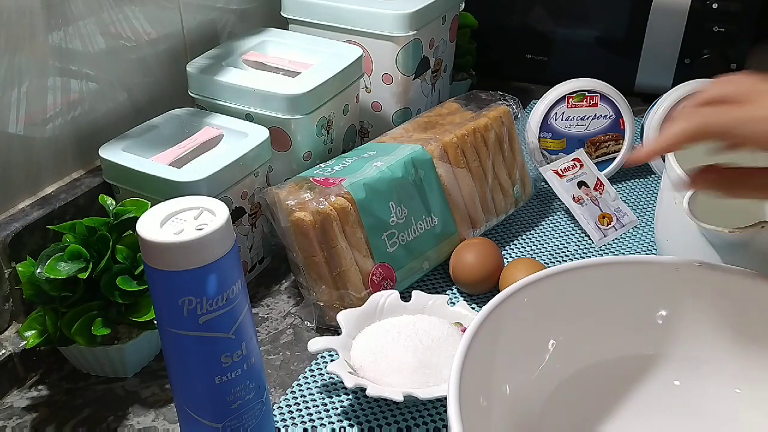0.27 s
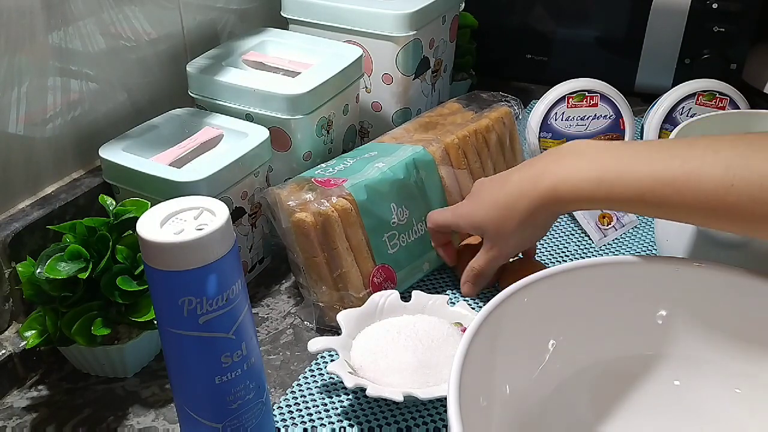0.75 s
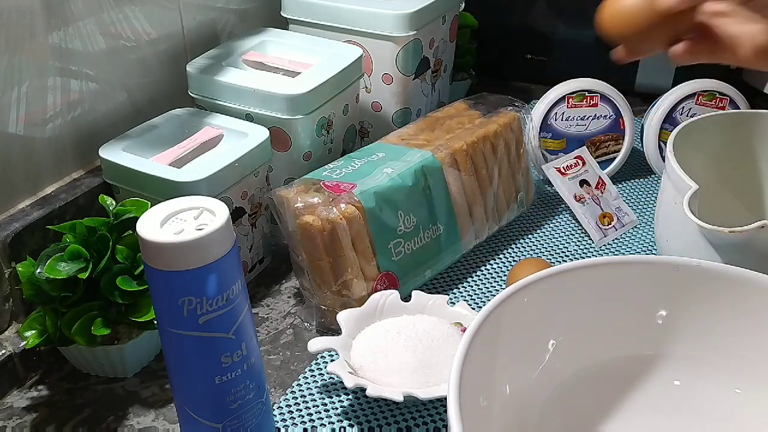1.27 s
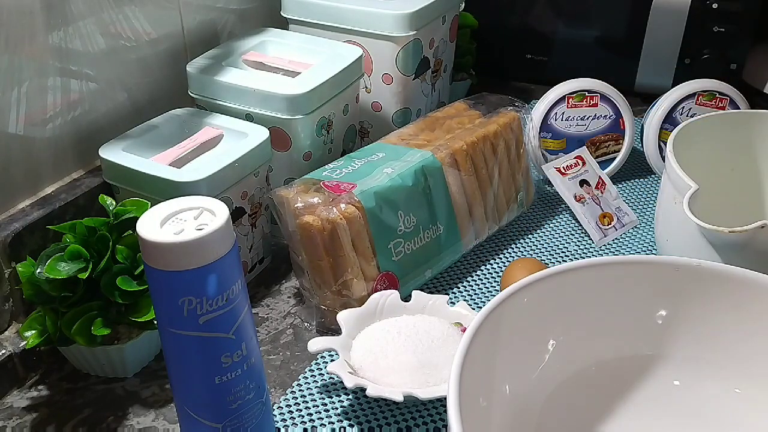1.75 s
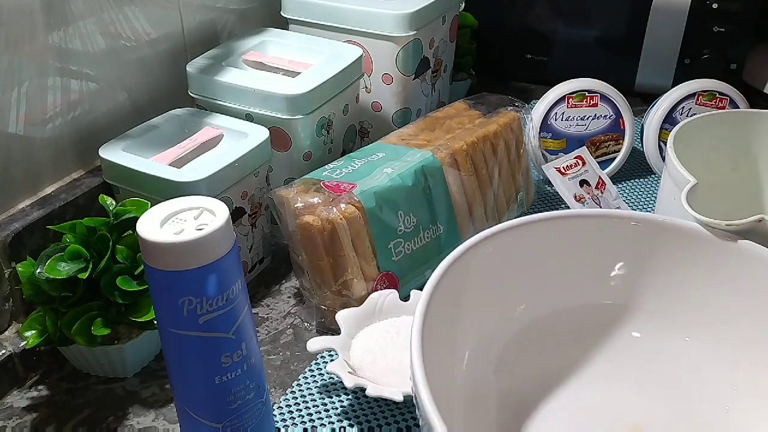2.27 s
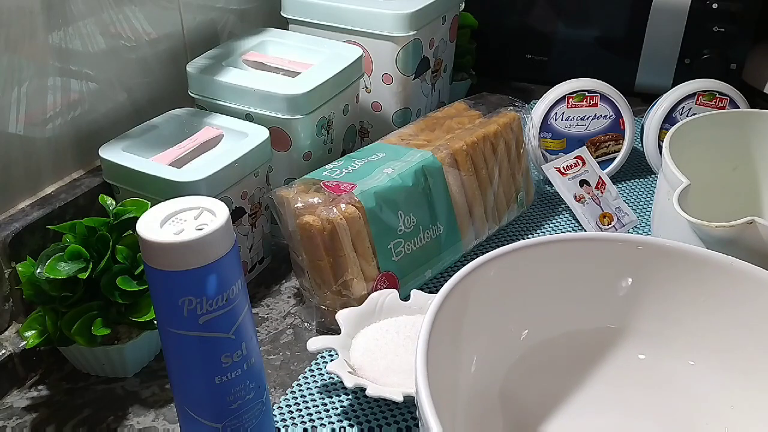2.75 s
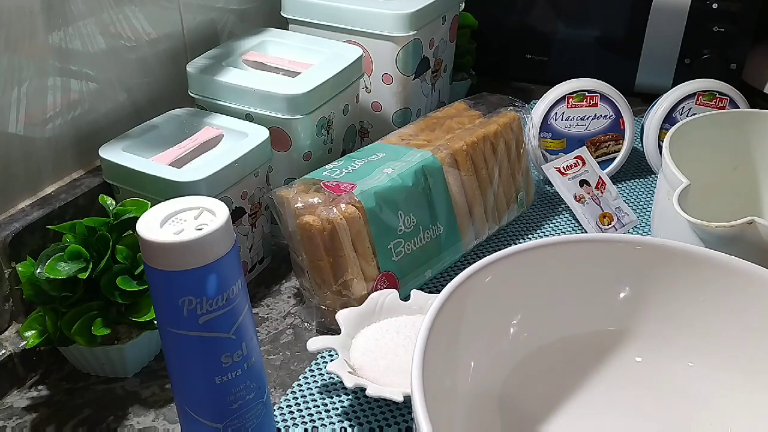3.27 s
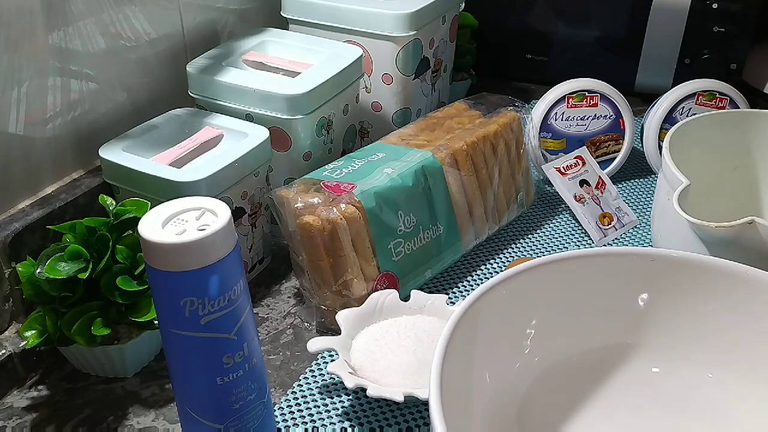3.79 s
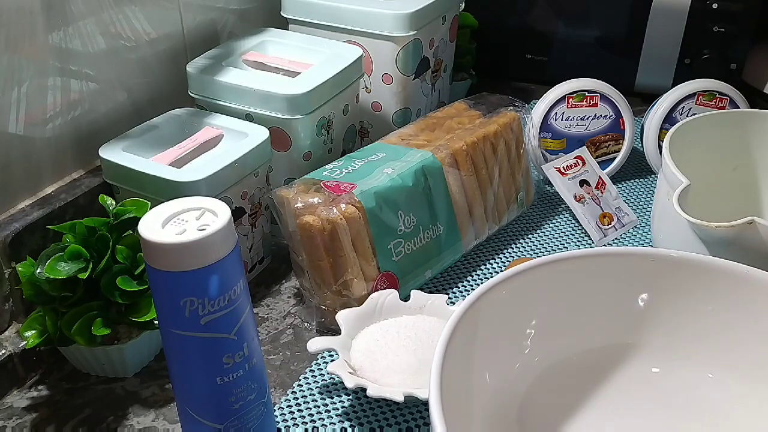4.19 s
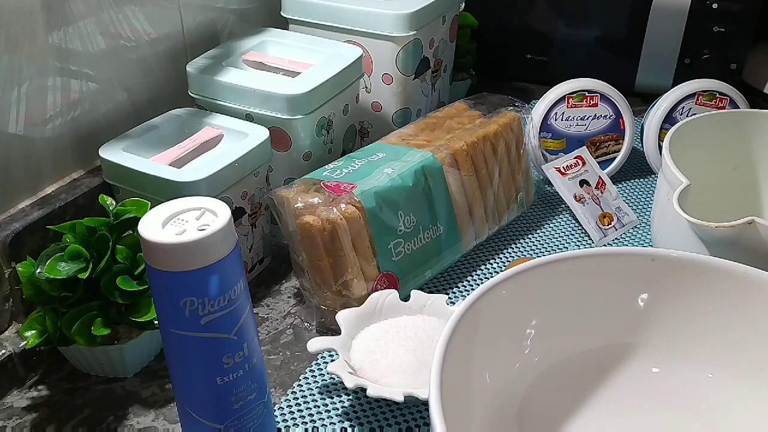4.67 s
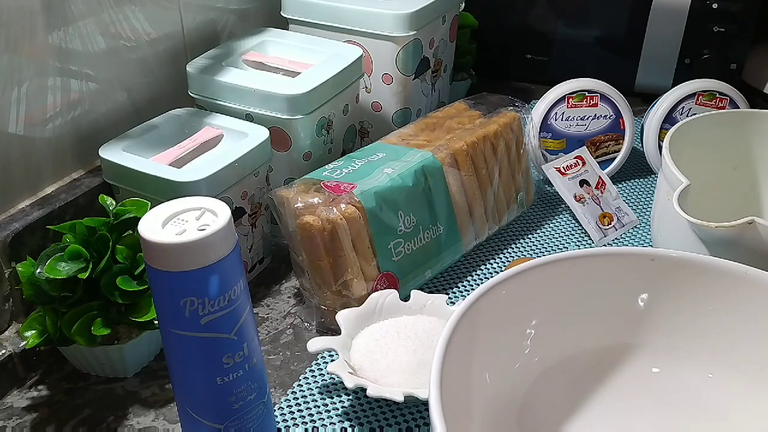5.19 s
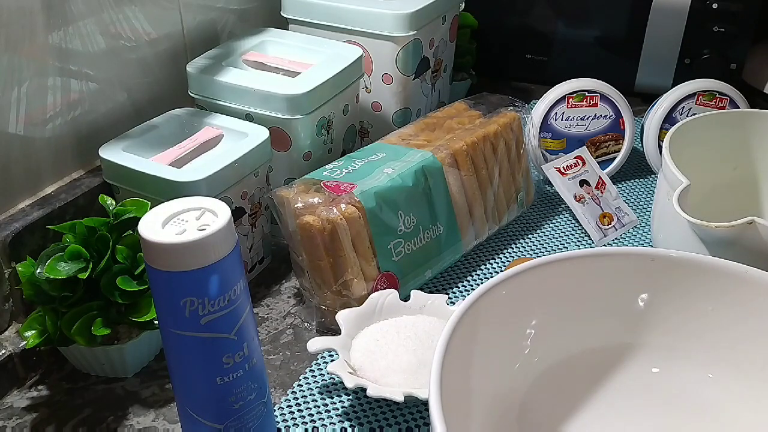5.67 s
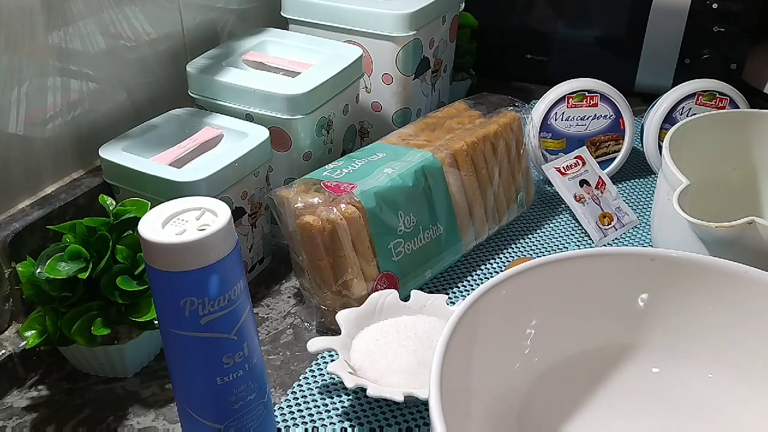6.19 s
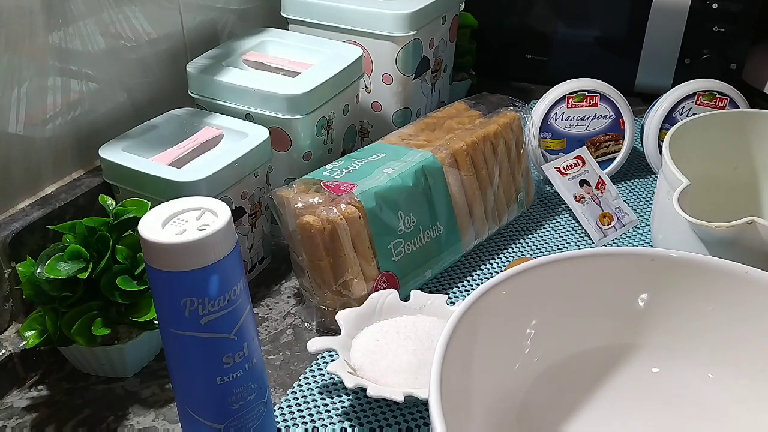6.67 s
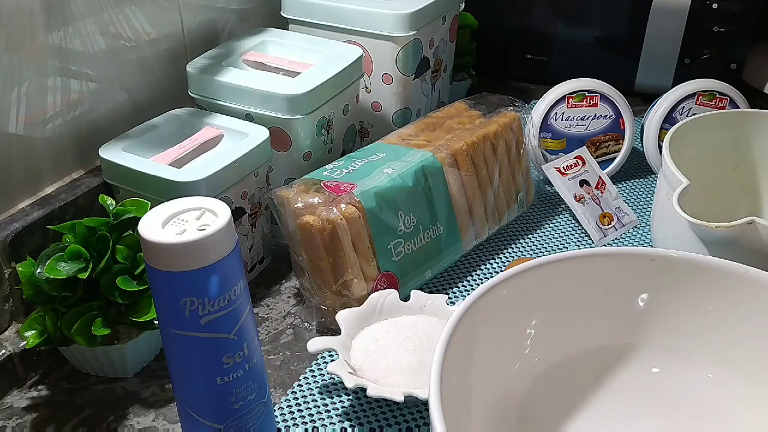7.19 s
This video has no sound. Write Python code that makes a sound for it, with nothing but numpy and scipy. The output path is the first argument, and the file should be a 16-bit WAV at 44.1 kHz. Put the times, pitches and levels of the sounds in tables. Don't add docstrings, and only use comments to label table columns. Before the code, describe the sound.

Close-up kitchen handling: soft rubbing and finger taps, short bright bowl clinks, two dry egg cracks, then small shell crackles over faint hum.

```python
import sys
import numpy as np
from scipy import signal
from scipy.fft import rfft, irfft, next_fast_len
from scipy.io import wavfile
from scipy.ndimage import uniform_filter1d

SR = 44100
rng = np.random.default_rng(int(sys.argv[2]) if len(sys.argv) > 2 else 0)


def to_wav(s):
    ch = np.atleast_2d(s).T
    pcm = np.round(np.clip(ch, -1, 1) * 32767)
    wavfile.write(sys.argv[1], SR, pcm.astype(np.int16))


def to_linear_factor(level_db):
    exponent = np.asarray(level_db, float) / 20
    return 10 ** exponent


N = 328104

MAINS_HZ = [100, 300, 500, 600]
# time in seconds, then the level of each overtone in dB
HUM_LEVELS = [(0, -81, -94.5, -90.5, -99), (5.6, -80, -98.5, -99, -99), (5.68, -82.5, -67.5, -67, -84.5),
              (5.95, -90, -70, -72, -80), (6.04, -83, -84, -82, -81), (6.25, -75, -80, -83, -83),
              (6.4, -84, -68, -76, -87), (6.6, -80, -74, -67, -87), (6.7, -73, -75, -74, -90),
              (6.92, -82.5, -75, -82, -85), (6.99, -76, -78, -66, -90), (7.14, -83, -72, -71, -89),
              (7.2, -82, -91, -86, -92), (7.3, -87, -90, -69, -86), (7.44, -84, -82, -85, -92)]
# frequency in Hz, density in dB per Hz
FLOOR_COLOUR = [(8.8, -32), (15, 2), (25, -8.5), (38, -20.5), (107, -20), (131, -32), (171, -25),
                (236, -26), (281, -29), (399, -29), (1490, -39.5), (1630, -39), (6460, -42.5), (10900, -38),
                (12300, -46.5), (16500, -55)]
# frequency in Hz, likeness from 0 to 1
LEFT_RIGHT_LIKENESS = [(30, 0.067), (250, 0.62), (1000, 0.043), (4000, 0.037), (12000, 0.039)]
# frequency in Hz, t60 in seconds
ROOM_T60 = [(150, 0.45), (600, 0.48), (2000, 0.5), (6000, 0.43), (10000, 0.36), (15000, 0.25)]
# frequency in Hz, density in dB per Hz
FIZZ_COLOUR = [(2060, -8), (3500, -4.5), (6650, -4), (9380, 0.5), (10800, -3.5), (15400, -18.5),
               (16200, -30.5), (16500, -48.5)]
# frequency in Hz, density in dB per Hz
BODY_COLOUR = [(300, -63), (600, -16), (900, -3), (2000, -4), (3500, -10.5), (6000, -19.5), (9000, -71)]
# frequency in Hz, density in dB per Hz
THUD_COLOUR = [(70, -21.5), (150, -6.5), (300, -6.5), (700, -8), (1200, -26), (2500, -88)]
# full strength at in seconds, hold in seconds, fizz in dB, body over fizz in dB
STROKES = [(0.0, 0.083, -65, 4), (0.12, 0.064, -61, -11), (0.286, 0.015, -66.5, -1),
           (0.358, 0.016, -73.5, 8.5), (0.507, 0.012, -53.5, 1.5), (0.694, 0.17, -52, -3.5),
           (0.892, 0.15, -60, 1.5), (1.14, 0.021, -65.5, -2.5), (1.443, 0.082, -61.5, -6.5),
           (1.65, 0.13, -68, -6.5), (1.814, 0.1, -65.5, 0.5), (2.007, 0.27, -71, -3.5),
           (2.807, 0.029, -63.5, -0.5), (3.165, .012, -74, -14), (3.368, 0.014, -53, -4.5),
           (3.422, 0.015, -70, -10), (3.573, 0.013, -72.5, -36), (3.662, 0.017, -66, -36),
           (3.807, 0.013, -61, 1), (4.807, 0.02, -65, 1.5), (5.147, 0.017, -68.5, -21),
           (5.245, .012, -77.5, 2), (5.639, .012, -68, -14), (5.809, 0.0096, -57.5, -2.5),
           (5.909, 0.017, -56.5, -13), (6.424, 0.084, -73, -23), (6.618, 0.03, -56.5, -18),
           (6.801, 0.025, -65, -1.5), (6.974, 0.2, -83, 9), (7.194, 0.014, -66, -7),
           (7.322, 0.0097, -62.5, -16)]
# full strength at in seconds, hold in seconds, thud in dB
SHOVES = [(0.0, 0.16, -64), (0.316, 0.033, -61), (0.51, 0.0099, -55), (0.67, 0.013, -56),
          (0.806, 0.33, -63), (1.38, 0.51, -71), (1.914, 0.0085, -55), (1.956, 0.039, -100),
          (2.762, 0.013, -74), (3.375, 0.013, -61.5), (4.816, .012, -79), (5.644, 0.31, -72.5),
          (6.445, 0.26, -67.5), (6.958, 0.19, -65), (7.302, 0.17, -70)]
# start in seconds, level in dB, pitch in Hz, t60 in seconds
NUDGES = [(.03, -58, 120, 0.27), (0.091, -56, 500, 0.11), (0.201, -58, 117, .3), (.27, -53, 120, 0.21),
          (.34, -55, 115, .15), (.66, -47, 626, 0.045), (.69, -53, 450, .04), (0.141, -55, 240, 0.085),
          (.28, -50, 250, 0.075), (.305, -42, 560, .03), (.306, -47, 907, 0.045),
          (0.308, -50.5, 1433, 0.044), (.32, -45, 530, 0.032), (.35, -52, 710, 0.052),
          (.36, -46, 964, 0.038), (.362, -49, 550, 0.046), (0.446, -50, 1970, 0.023), (.565, -46, 190, .06),
          (.7075, -47, 9500, .004), (.908, -42, 2720, 0.011), (1.011, -55, 10500, .004),
          (1.884, -57, 1933, 0.19), (1.97, -67, 2880, 0.14), (2.008, -59.5, 1860, 0.094),
          (2.009, -66, 7540, 0.071), (2.01, -72, 6170, 0.055), (2.02, -67, 2880, .15),
          (2.061, -71, 1850, 0.066), (2.225, -41.5, 2500, 0.038), (2.212, -56, 3540, 0.014),
          (2.216, -52, 4400, 0.0071), (2.222, -48, 596, 0.034), (2.232, -48, 348, .04),
          (2.236, -52, 1210, 0.018), (2.2565, -17, 4876, 0.087), (2.256, -30, 2873, 0.35),
          (2.256, -33, 4160, .1), (2.256, -39, 3182, 0.07), (2.302, -27, 1868, 0.12),
          (2.33, -36, 4878, 0.33), (2.456, -29.5, 1810, 0.27), (2.472, -45.5, 1850, .6),
          (2.452, -45.5, 4876, 0.38), (2.452, -47, 4820, 0.44), (2.47, -52, 3700, 0.15),
          (2.78, -63, 396, .05), (2.8, -62.5, 2954, 0.093), (3.33, -61, 2880, .08), (3.335, -56, 1850, .1),
          (3.366, -50.5, 1860, 0.12), (3.37, -47, 920, .05), (3.375, -49, 235, 0.046),
          (3.82, -63.5, 952, .25), (4.414, -45, 243, .06), (4.437, -47, 130, .09),
          (6.249, -55, 275.6, 0.14), (6.645, -44, 2030, 0.019), (6.66, -47, 2800, 0.023),
          (6.44, -54.5, 259, .3), (6.47, -58, 118.7, .25), (6.7, -52, 265, .08), (7.04, -55, 172.7, 0.17),
          (7.08, -57, 280, 0.17), (7.163, -58, 10000, 0.0058), (7.197, -50, 2320, .02),
          (7.213, -49, 8800, .012), (7.301, -58, 250, 0.22)]
# start in
# seconds, level in dB, pitch in Hz, t60 in seconds
BUMPS = [(0, -65.5, 121, 6.2), (0.041, -58.5, 254.7, 2), (0.1556, -35, 2750, 0.0052),
         (0.469, -45, 192, 0.069), (0.5, -27.5, 198, 0.03), (0.55, -65, 187, .15), (.622, -38, 423, 0.029),
         (.624, -35.5, 640, 0.012), (.633, -35, 520, 0.015), (1.8691, -19.5, 483.3, 0.017),
         (1.8698, -27.5, 795.6, 0.014), (1.8702, -34, 1050, 0.0063), (1.877, -28.5, 297.8, 0.032),
         (1.876, -39, 228.7, 0.16), (1.909, -34, 545, 0.016), (1.95, -43.5, 548, 0.016),
         (2.212, -49, 415.3, 0.04), (3.384, -53, 244, 0.083), (1.871, -59, 1839, 0.08),
         (1.871, -60, 2180, 0.069), (1.9, -67, 2877, 0.15), (2.01, -65.5, 4160, 0.073)]
# start in seconds, peak in dB, dullness in dB, left-right in dB
FINGERS = [(0.154, -64, 4, 5), (0.447, -60, 15, 4), (0.47, -33.5, -29, -5), (0.5026, -29, -11.5, 11.5),
           (0.5073, -23, -13.5, -2), (0.556, -30.5, -40, 6), (0.6533, -44, 3, 0), (0.6637, -34, -3, -1),
           (0.7053, -45, 5, 5), (0.7136, -41, -18, 16), (0.729, -32, -12, -3), (0.7583, -25.5, -9.5, -5),
           (0.769, -35, -7, 17), (0.8293, -31.5, -12, 6), (0.838, -29.5, -12, -9), (0.845, -29.5, -9, 4),
           (0.857, -30, -19, 0), (0.888, -27, -23, -1), (0.895, -23.5, -8, -2), (0.9651, -27.5, -20, 0),
           (0.977, -48, -10, 1), (1.0242, -34, -13, 3), (1.03, -31, -11, 1), (1.054, -33.5, -9.5, -3),
           (1.111, -25.5, -18.5, -0.5), (1.1184, -42, -17, -5), (1.389, -61, 13, 3),
           (1.481, -34.5, -12.5, 5), (1.679, -40, -13, 0)]
# start in seconds, peak in dB, dullness in dB,
# left-right in dB
SHELL = [(3.653, -45.5, -30.5, 14), (5.6353, -37.5, -9, 1), (5.7993, -43, -8, 12), (5.882, -34, -10, 3),
         (5.903, -46, -17, -5), (5.911, -31, -19, 4), (5.92, -38, -17, 3), (6.097, -46.5, -8.5, 2),
         (6.4043, -43, -16, 1), (6.4614, -44, -21, 0), (6.5198, -42.5, -21, 3), (6.594, -47.5, -16, -1),
         (6.6049, -44, -2, 4), (6.613, -41, -3, -5), (6.628, -41, -5, 8), (6.6331, -17, -18.5, 0.5),
         (6.9508, -41.5, 2.5, 2.5), (6.958, -52, 8, -8), (6.992, -38.5, -1.5, 1), (7.001, -55, 1, 0),
         (7.092, -43, -5.5, 0.5), (7.194, -52.5, -1.5, 8), (7.287, -38, -11, 2), (7.293, -29.5, -17, 0)]
# start in seconds, peak in dB, thud in dB, body in dB, left-right in dB
BLOWS = [
    (2.2108, -44.5, 21.5, 13.5, 1),
    (2.254, -11, -7, -5, -2.5),
    (2.2605, -15, -11.5, 0, 0.5),
    (2.4447, -23.5, -3.5, 5, 12),
    (2.4478, -23, -23, 3, 3.5),
]
# start in seconds, peak in dB, thud in dB, body in dB, left-right in
# dB
LEAD_IN = [
    (4.1805, -38.5, -43.5, -3.5, 0.0026),
]
# frequency in Hz, level in dB
SNAP_COLOUR = [(5500, -7), (6600, -6.5), (8000, -1.5), (10500, 2), (12500, -7.5), (16000, -15),
               (16900, -61.5)]
# start in seconds, strength in dB, tilt in dB per octave
TOUCHES = [
    (1.499, -63, 2),
    (1.872, -69, -2.5),
    (3.366, -81, 11.5),
    (3.691, -74.5, 2.5),
]
# pitch in Hz, level in dB, t60 in seconds
FREE_BOWL_MODES = [(382, 0, 1.6), (953, -2, 1.4), (1835, -15, .45)]
# start in seconds, strength in dB, left-right in dB, tilt in dB per octave, blow 0 or 1
CLINKS = [
    (2.252, -8.5, -4, 0, 0),
    (2.2597, -21, 0.5, 3.5, 0),
    (2.4441, -19, -3.5, 4, 1),
    (2.4462, -11.5, -0.5, 1.2, 1),
]
BOWL_HZ = [382, 575, 650, 942, 1118, 1408, 1585, 1775, 1830, 1872, 2170, 2330, 2531, 2855, 3640, 4160, 4655,
           4876, 5556, 6025, 6804, 7531, 7590, 8672, 9357, 9915, 11300, 12600, 13800, 15000, 754, 1265,
           1491, 1692, 2288, 2902, 3182, 3690, 3903, 4037, 5173, 5308, 5475, 5728, 6169, 6500, 7397, 8170,
           8538, 8904, 9625, 10680, 11160, 12075, 13248, 455, 830]
# first blow in dB, second blow in dB, t60 in seconds
BOWL_MODES = [(-23, -28.5, 0.22), (-10.5, -17.5, 0.07), (-18, -24, 0.14), (-8.5, -22, 0.18),
              (-7.5, -13.5, 0.049), (-8, -26.5, 0.06), (-10.5, -11.5, 0.042), (-6, -10.5, 0.09),
              (-20, -47, 0.15), (-23.5, -42, 0.072), (-12.5, -29, 0.04), (-18.5, -35, 0.11),
              (-20.5, -57, 0.37), (-12, -32.5, 0.18), (-19.5, -32, 0.058), (-20.5, -22, 0.078),
              (-17.5, -39.5, 0.066), (-12.5, -38, 0.13), (-17.5, -27, 0.079), (-21, -25, 0.06),
              (-19, -28, 0.073), (-15, -25, 0.051), (-22.5, -20.5, .1), (-20, -37, 0.076),
              (-22, -35.5, 0.12), (-13.5, -25, 0.061), (-23.5, -39, 0.11), (-27.5, -31.5, .06),
              (-25, -31.5, .05), (-31.5, -37, .05), (-20.5, -21, .1), (-21.5, -27.5, 0.048),
              (-16.5, -37.5, 0.11), (-10.5, -34.5, 0.074), (-28.5, -23.5, 0.1), (-30, -20, .09),
              (-24, -40.5, 0.043), (-33, -29.5, 0.057), (-28, -46, .05), (-28.5, -40, .05),
              (-26, -37.5, .05), (-36, -24, .06), (-18, -40.5, .05), (-22.5, -39, 0.081), (-22, -40, 0.13),
              (-26.5, -26.5, 0.067), (-14.5, -20, 0.036), (-19.5, -36, 0.037), (-20.5, -31, 0.065),
              (-23.5, -37, 0.071), (-20.5, -39.5, 0.096), (-34.5, -38.5, .05), (-28, -27, 0.055),
              (-33.5, -39, .05), (-29.5, -41, .05), (-16, -17.5, 0.065), (-17, -13.5, .05)]
# start in seconds, level in dB, pitch in Hz,
# touch in seconds, choke in dB, t60 in seconds after
RIMS = [
    (2.2521, -8.5, 1872, 0.015, -9, .3),
    (2.4461, -14.5, 1845, 0.011, -16.5, 0.5),
]
# start in seconds, level in dB, left-right in dB, crack t60 in seconds, rise in seconds
KNOCKS = [
    (4.1901, 7.5, 0, 0.02, 0.00033),
    (4.412, -0.5, 1, 0.037, .003),
]
# frequency in Hz, level in dB
KNOCK_COLOURS = [
    [(25, -11.5), (110, -18), (230, -16), (380, -24), (520, -12), (680, -12), (810, -8), (1000, -10),
     (1250, -12), (1450, -9), (1650, -7.5), (1850, -8), (2060, -9), (2400, -12), (2700, -15.5),
     (3200, -15.5), (3760, -13), (4450, -19.5), (5610, -9.5), (6300, -12.5), (7500, -6), (8650, -4.5),
     (10800, -10), (12800, -17), (16300, -22), (17000, -62.5)],
    [(25, -25), (156, -10.5), (396, -19.5), (500, -11.5), (910, -14.5), (1150, -8), (1370, -5),
     (1700, -13.5), (2200, -5.5), (2500, -5.5), (2830, -6.5), (3200, -12.5), (3830, -8.5), (5380, -12),
     (5950, -11.5), (6400, -8.5), (10800, -3.5), (12800, -18), (16000, -16), (16800, -66)],
]


def unit(x):
    return x / np.sqrt(np.mean(x ** 2) + 1e-20)


def along(points, hz):
    f, v = np.transpose(points)
    return np.interp(np.log(hz + 1), np.log(f + 1), v)


def curves(rows):
    s, *cols = np.transpose(rows)
    return [np.interp(np.arange(N) / SR, s, c) for c in cols]


def add(track, s, sound):
    part = track[:, round(s * SR):][:, :sound.shape[1]]
    part += sound[:, :part.shape[1]]


def patches(shape, bins, frames):
    field = uniform_filter1d(rng.standard_normal(shape), size=bins, axis=0)
    return unit(uniform_filter1d(field, size=frames, axis=1))


def rush(spectrum, patchy_db):
    z = signal.stft(rng.standard_normal((2, N)), nperseg=256)[2]
    field = patches(z.shape[1:], 10, 5)
    pair = signal.istft(z * to_linear_factor(patchy_db * field), nperseg=256)[1][:, :N]
    hz = np.fft.rfftfreq(N, 1 / SR)
    turn = np.arccos(np.clip(along(LEFT_RIGHT_LIKENESS, hz), -1, 1)) / 2
    shared = [np.cos(turn), np.sin(turn)]
    mid, side = irfft(rfft(pair, N) * to_linear_factor(along(spectrum, hz)) * shared, N)
    return np.array([mid + side, mid - side]) / np.std(mid + side)


def causal(spectrum):
    cepstrum = irfft(np.log(to_linear_factor(along(spectrum, np.fft.rfftfreq(2048, 1 / SR)))))
    cepstrum[1:1024] *= 2
    cepstrum[1025:] = 0
    return irfft(np.exp(rfft(cepstrum)))[:1024]


def swells(starts, holds, levels_db):
    swell_db_per_s, fade_db_per_s = 311, 138
    t = np.arange(0, N, 64) / SR
    gain = 0
    for s, hold, db in zip(starts, holds, levels_db):
        swell_db = swell_db_per_s * np.maximum(s - t, 0)
        fade_db = fade_db_per_s * np.maximum(t - s - hold, 0)
        gain = gain + to_linear_factor(db - swell_db - fade_db)
    return np.interp(np.arange(N) / SR, t, gain)


def ringing(modes, seconds, rise_s):
    t = np.arange(round(seconds * SR)) / SR
    ring = sum(to_linear_factor(db - 60 * t / t60) * np.sin(2 * np.pi * hz * t) for hz, db, t60 in modes)
    return ring * (1 - np.exp(-t / rise_s))


def crack(burst_s, rise_s=0.00017, spike=0):
    t = np.arange(SR // 30) / SR
    shared = 0.13 * rng.standard_normal(len(t))
    burst = shared + rng.standard_normal((2, len(t)))
    burst *= to_linear_factor(-60 * t / burst_s) * (1 - np.exp(-t / rise_s))
    burst *= 1 + spike * to_linear_factor(-60 * t / 0.001)
    return burst / np.linalg.norm(burst, axis=1, keepdims=True)


def kitchen(sound, direct, pan_db, wet_db, clumps_db=1.14):
    hz, t, (a, b) = signal.stft(rng.standard_normal((2, SR // 2)), SR, nperseg=128)
    turn = np.arccos(np.clip(along(LEFT_RIGHT_LIKENESS, hz), -1, 1))[:, None] / 2
    mid, side = np.cos(turn) * a, np.sin(turn) * b
    pair = np.array([mid + side, mid - side])
    uneven_db = clumps_db * patches(a.shape, 5, 3)
    decay_db = 60 * t / along(ROOM_T60, hz)[:, None]
    tail = signal.istft(pair * to_linear_factor(uneven_db - decay_db), SR, nperseg=128)[1]
    t = np.arange(tail.shape[1]) / SR
    tail *= (1 - np.exp(-t / 0.0014)) * (1 + 2.6 * np.exp(-t / 0.086))
    tail *= to_linear_factor(wet_db) / np.linalg.norm(tail[0])
    add(tail, 0, direct)
    return signal.fftconvolve(sound[None], tail, axes=1) * to_linear_factor([[pan_db / 2], [-pan_db / 2]])


def background():
    t = np.arange(N) / SR
    hum = sum(to_linear_factor(db) * np.sin(2 * np.pi * hz * t) for hz, db in zip(MAINS_HZ, curves(HUM_LEVELS)))
    return to_linear_factor(-62.5) * rush(FLOOR_COLOUR, patchy_db=1.4) + hum


def hands():
    s, hold, fizz_db, body_db = np.transpose(STROKES)
    fizz = swells(s, hold, fizz_db) * rush(FIZZ_COLOUR, patchy_db=0.5)
    body = swells(s, hold, fizz_db + body_db) * rush(BODY_COLOUR, patchy_db=2.0)
    thud = swells(*np.transpose(SHOVES)) * rush(THUD_COLOUR, patchy_db=3.0)
    return fizz + body + thud


def nudges():
    dry = np.zeros((1, N))
    for s, db, hz, t60 in NUDGES:
        add(dry, s, ringing([(hz, db, t60)], min(t60, 1 / 2), rise_s=3.1 / hz)[None])
    return kitchen(dry[0], np.ones((2, 1)), 0, wet_db=-2.5)[:, :N]


def bumps():
    out = np.zeros((2, N))
    for s, db, hz, t60 in BUMPS:
        ring = ringing([(hz, db, t60)], 1 / 2, rise_s=0.52 / hz)
        add(out, s, kitchen(ring, np.ones((2, 1)), 0, wet_db=-1.0))
    return out


def taps():
    out = np.zeros((2, N))
    finger_thud_db, shell_thud_db = -9.5, -12.5
    fingers = [(s, db, dull + finger_thud_db, dull, pan) for s, db, dull, pan in FINGERS]
    shell = [(s, db, dull + shell_thud_db, dull, pan) for s, db, dull, pan in SHELL]
    nails = BLOWS + fingers
    for k, (s, db, thud, body, pan) in enumerate(nails + shell + LEAD_IN):
        burst_s, wet_db = (0.012, -3.0) if k < len(nails) else (0.02, 0.0)
        colour = [(90, thud - 20), (300, thud + 9), (600, thud + 8),
                  (1300, body + 8), (2600, body + 7), (4200, 0.4 * body - 5)]
        blow = causal(colour + SNAP_COLOUR)
        add(out, s, to_linear_factor(db + 15.0) * kitchen(blow, crack(burst_s, 0.00043), pan, wet_db))
    return out


def bowls():
    out = np.zeros((2, N))
    lagging = np.eye(6)[[0, 5]]
    for s, db, pan, tilt_db, blow in CLINKS:
        modes = [(hz, row[round(blow)] + tilt_db * np.log2(hz / 1800), row[-1])
                 for hz, row in zip(BOWL_HZ, BOWL_MODES)]
        add(out, s, to_linear_factor(db) * kitchen(ringing(modes, 0.34, rise_s=0.00099), lagging, pan, wet_db=0.5))
    t = np.arange(SR // 2) / SR
    for s, db, hz, touch_s, choke_db, t60 in RIMS:
        level_db = choke_db * np.clip((t - touch_s) / 0.0015, 0, 1) - 60 * t / t60
        rim = np.sin(2 * np.pi * hz * t) * to_linear_factor(level_db) * (1 - np.exp(-t / 0.0036))
        add(out, s, to_linear_factor(db) * kitchen(rim, np.eye(3)[[0, 2]], 2.2, wet_db=-8.0))
    for s, db, tilt_db in TOUCHES:
        modes = [(hz, level + tilt_db * np.log2(hz / 380), t60) for hz, level, t60 in FREE_BOWL_MODES]
        add(out, s, to_linear_factor(db) * kitchen(ringing(modes, 1.2, rise_s=0.011), lagging, 0, wet_db=-8.0))
    return out


def egg():
    out = np.zeros((2, N))
    for (s, db, pan, burst_s, rise_s), colour in zip(KNOCKS, KNOCK_COLOURS):
        blow = causal(colour)
        blow /= np.linalg.norm(blow)
        direct = crack(burst_s, rise_s, spike=3.3)
        add(out, s, to_linear_factor(db) * kitchen(blow, direct, pan, wet_db=1.0, clumps_db=3))
    return out


def scene():
    return taps() + bumps() + egg() + bowls() + hands() + background() + nudges()


def top_cut(x):
    return signal.sosfilt(signal.butter(12, 16860, fs=SR, output="sos"), x)


def record(dry):
    size = next_fast_len(N)
    over_hz = np.maximum(np.fft.rfftfreq(size, 1 / SR) - 15950, 0)
    mix = irfft(rfft(dry, size) * to_linear_factor(-0.13 * over_hz), size)[:, :N]
    return top_cut(mix)


dry = scene()
out = record(dry)
to_wav(out)
```